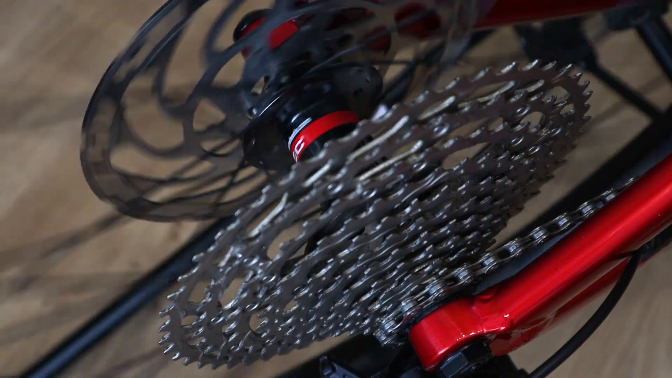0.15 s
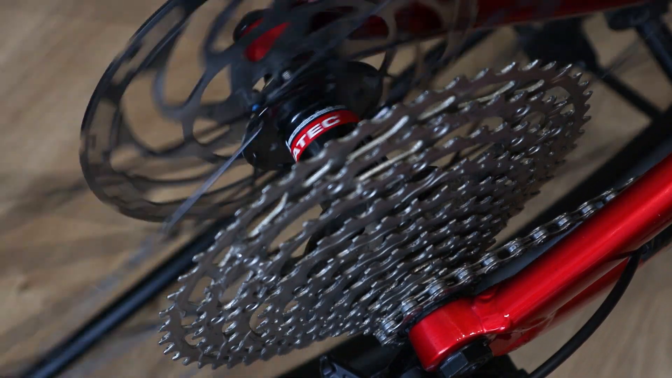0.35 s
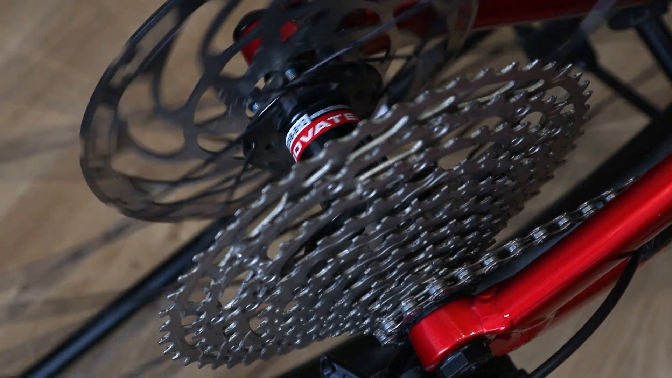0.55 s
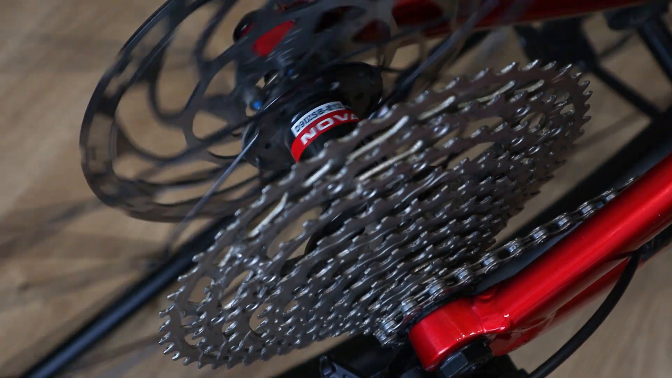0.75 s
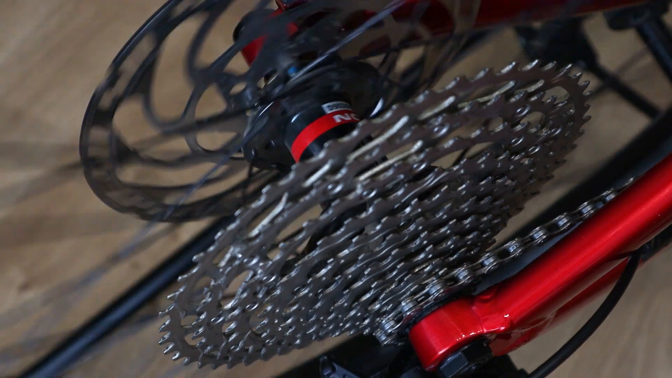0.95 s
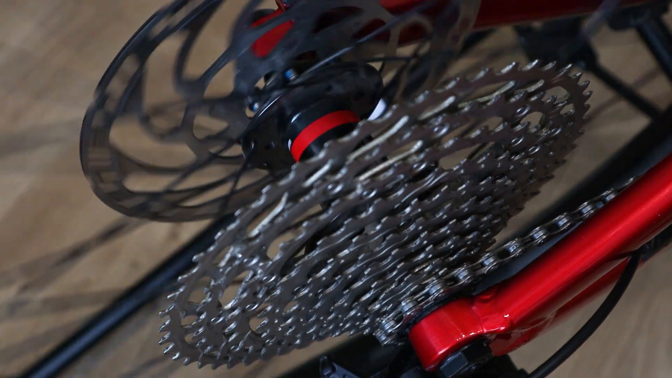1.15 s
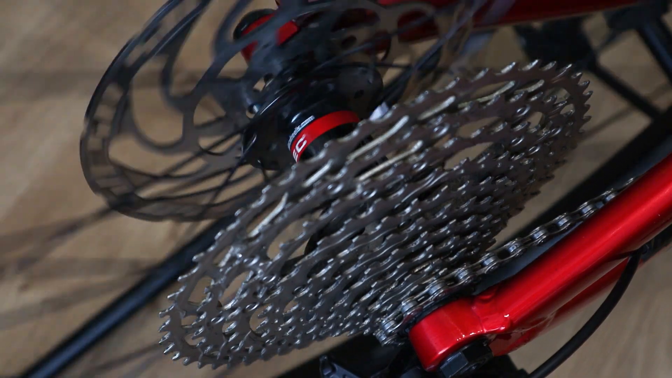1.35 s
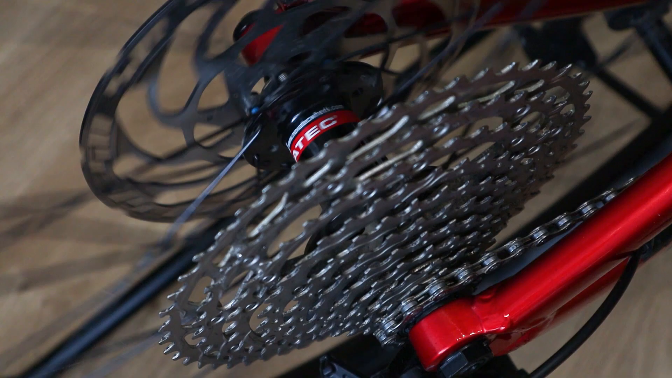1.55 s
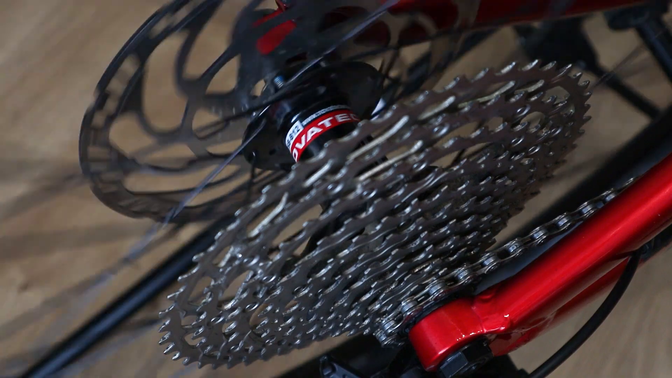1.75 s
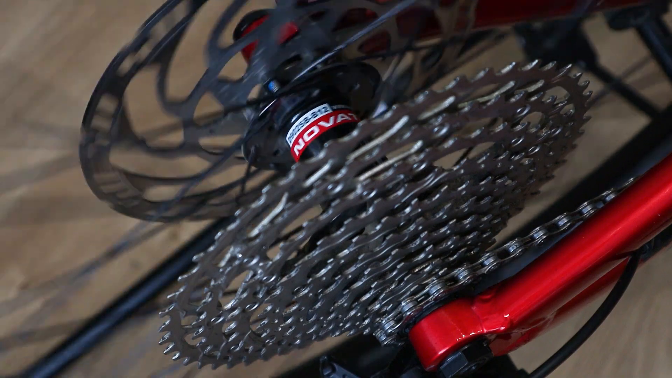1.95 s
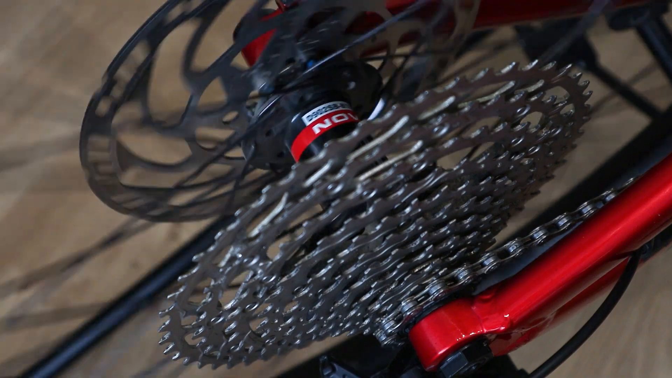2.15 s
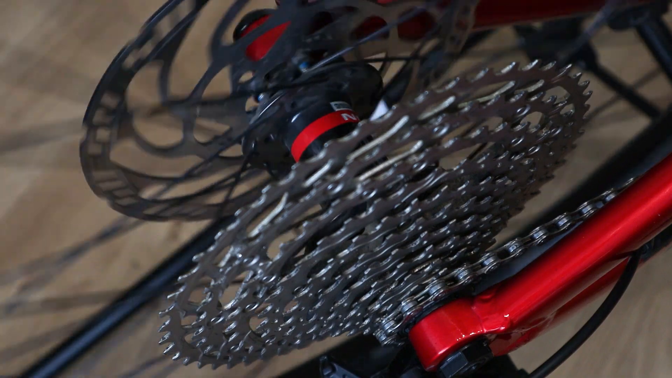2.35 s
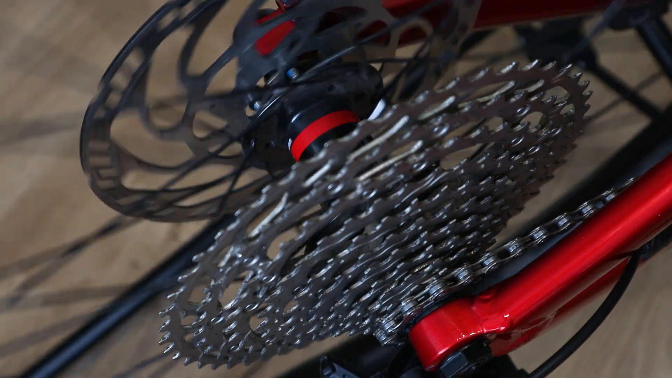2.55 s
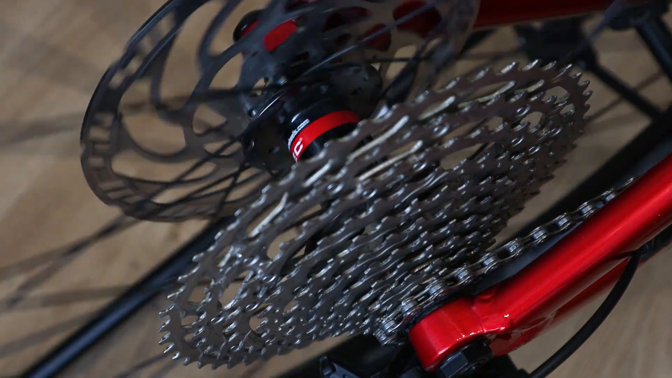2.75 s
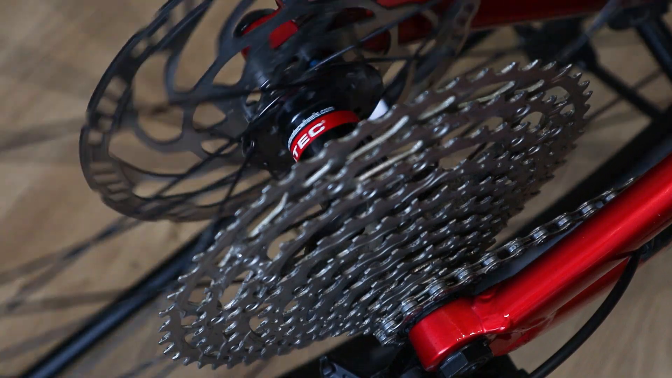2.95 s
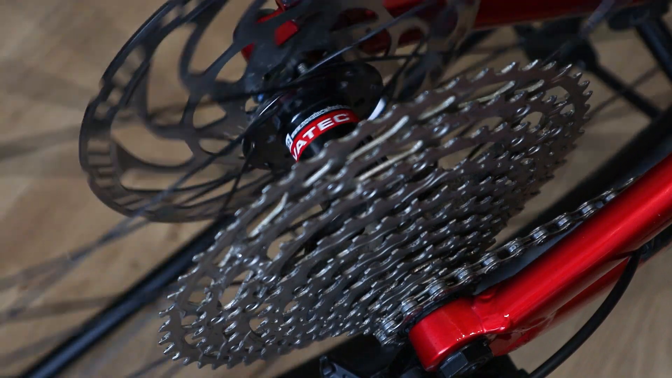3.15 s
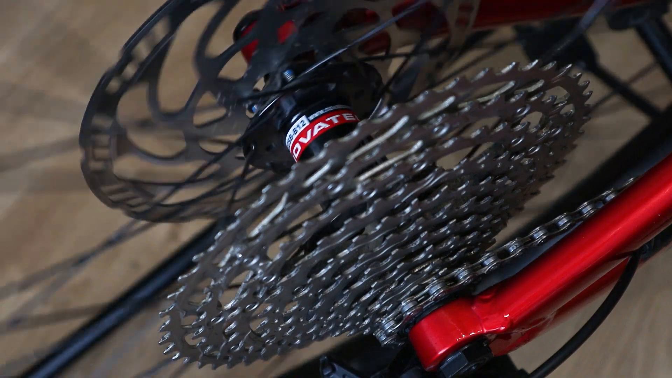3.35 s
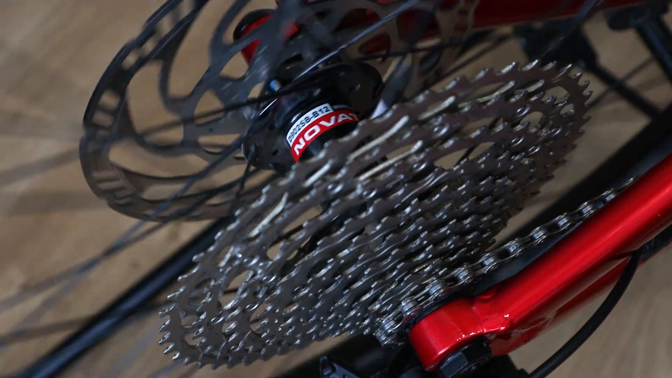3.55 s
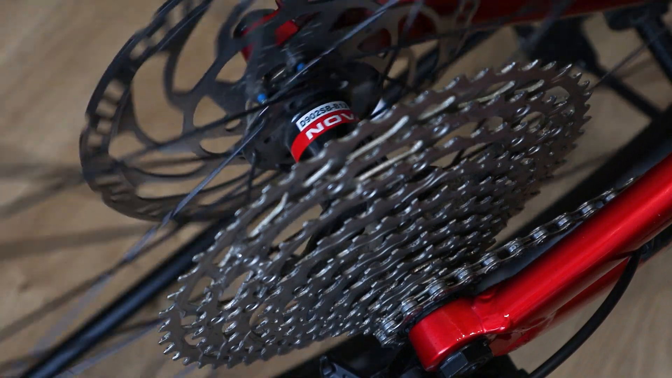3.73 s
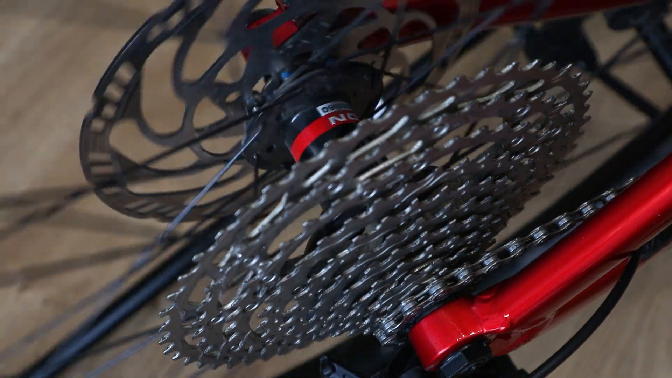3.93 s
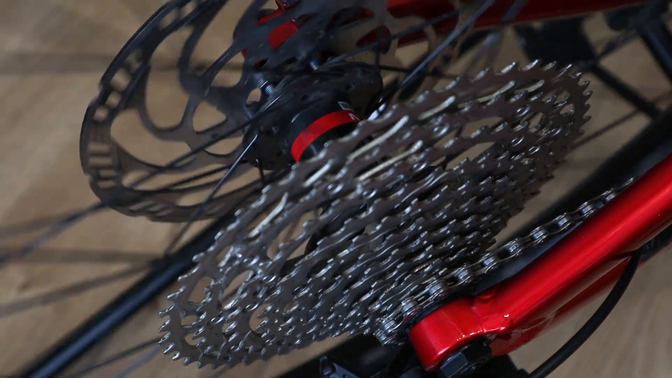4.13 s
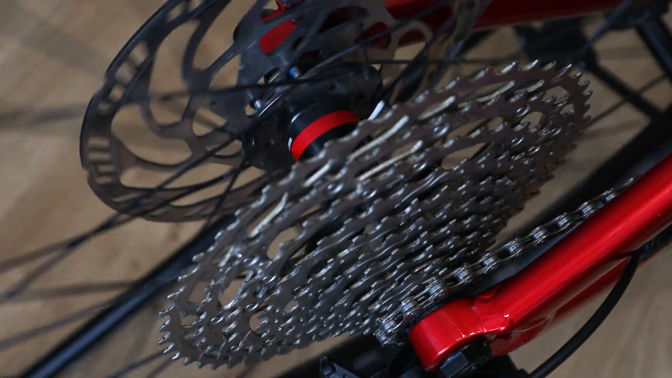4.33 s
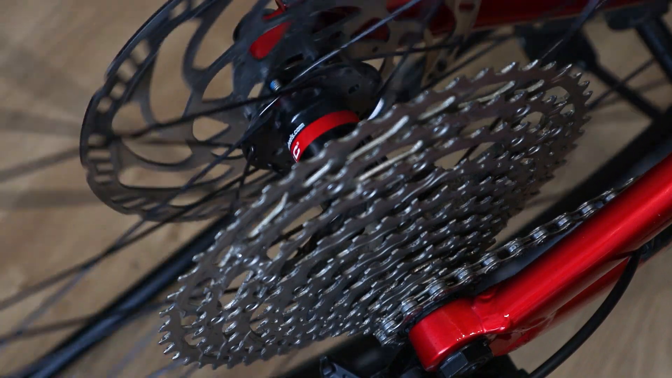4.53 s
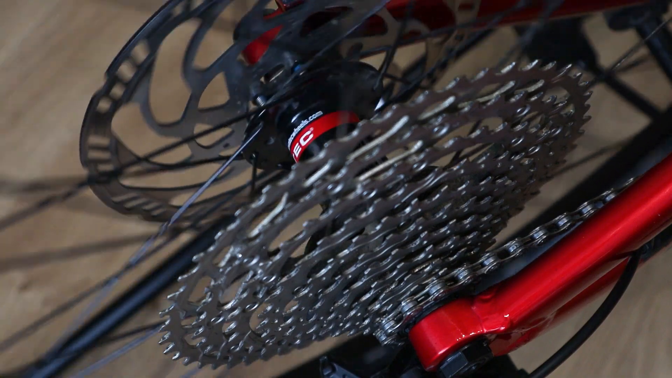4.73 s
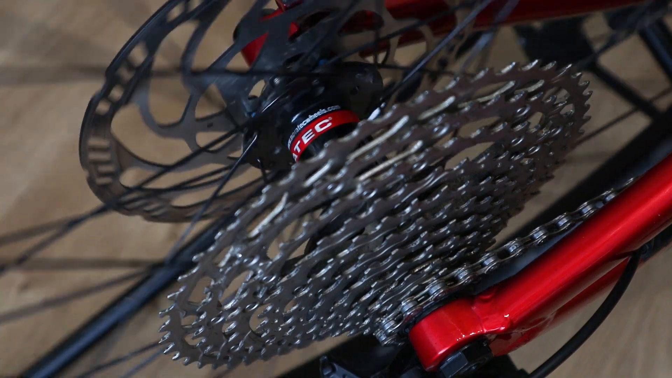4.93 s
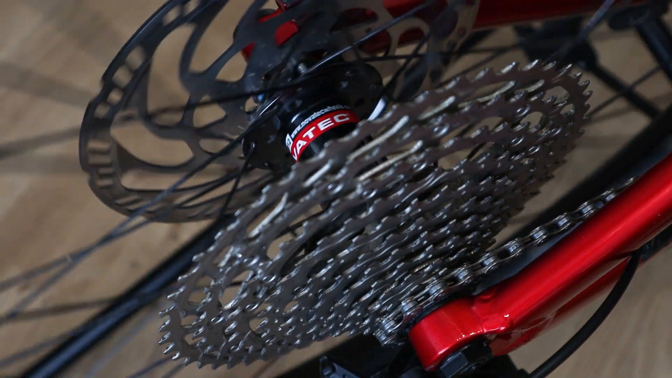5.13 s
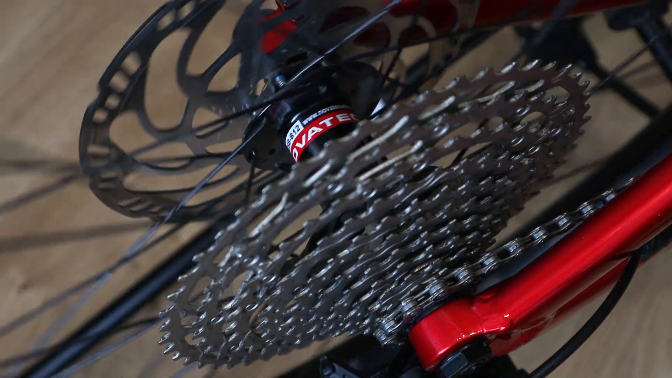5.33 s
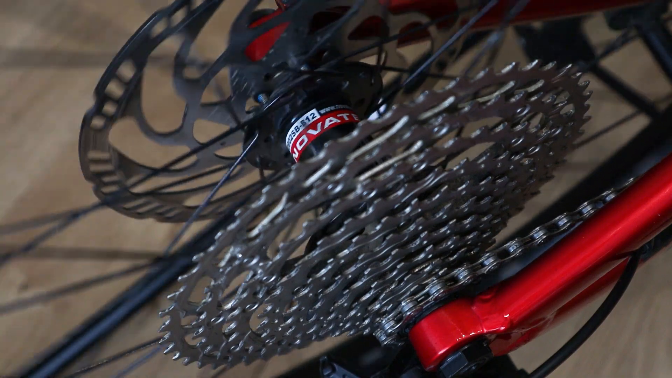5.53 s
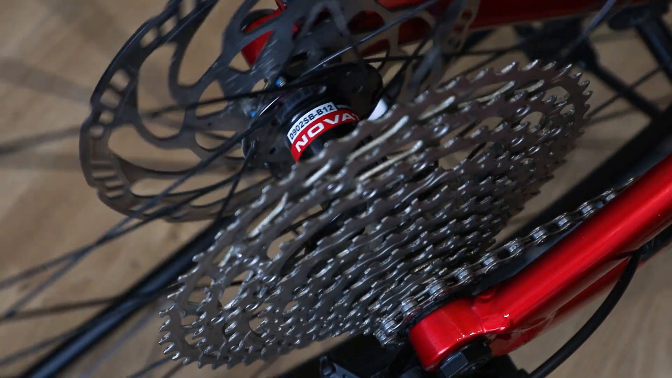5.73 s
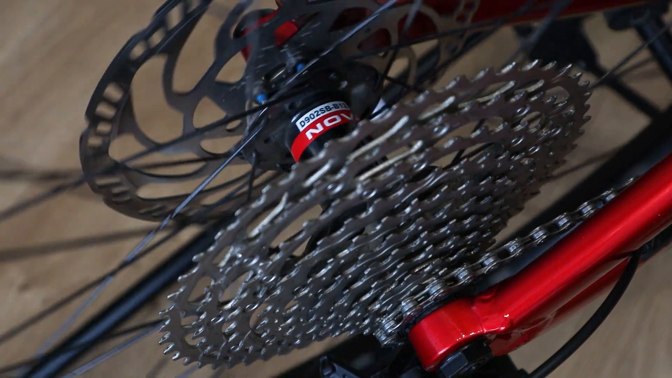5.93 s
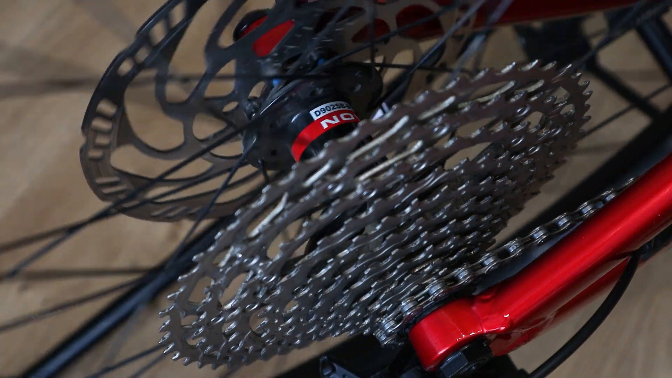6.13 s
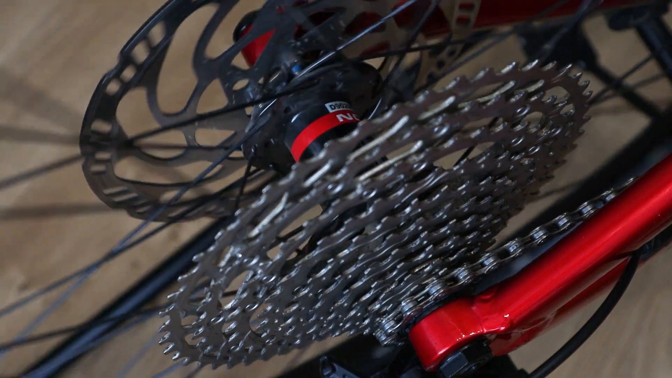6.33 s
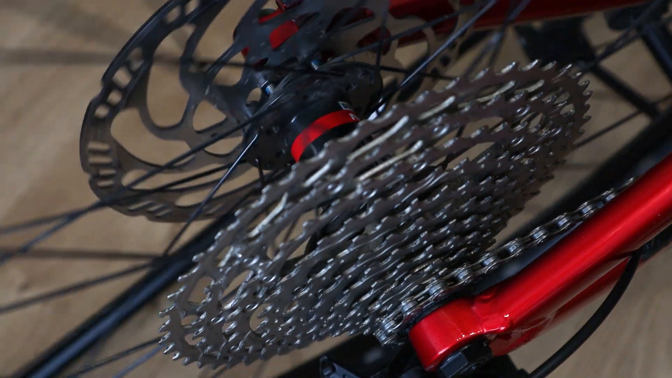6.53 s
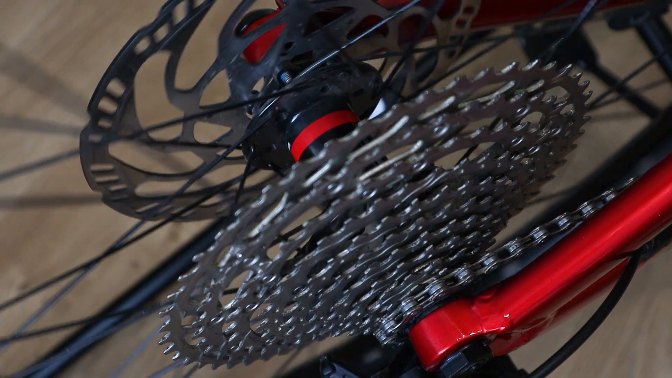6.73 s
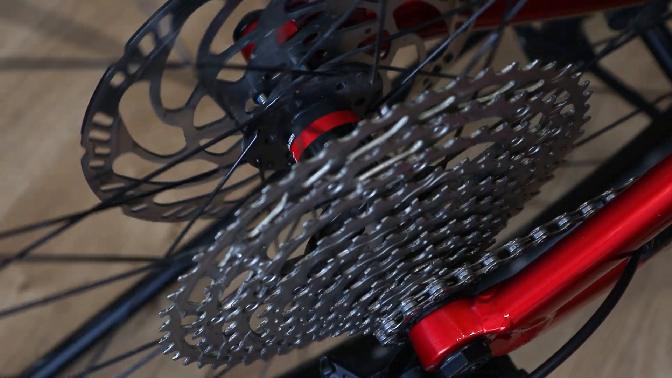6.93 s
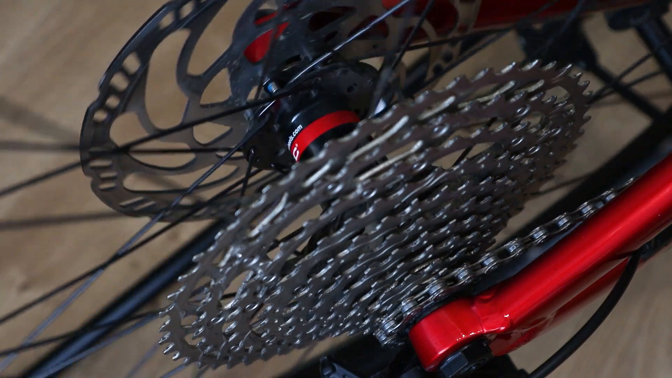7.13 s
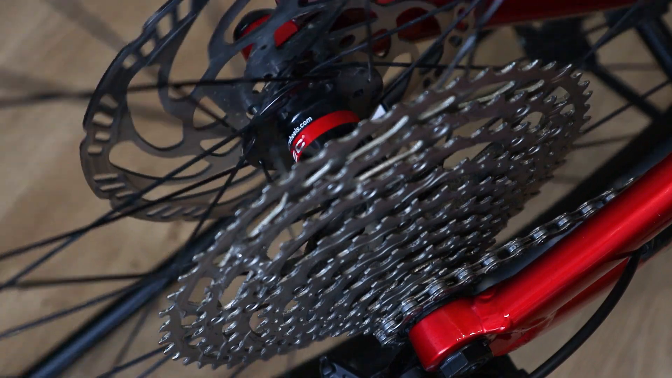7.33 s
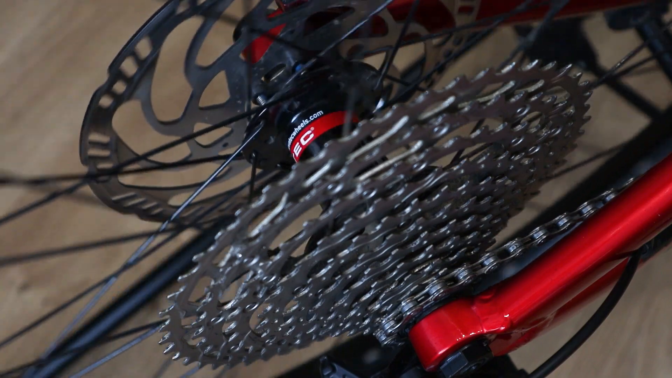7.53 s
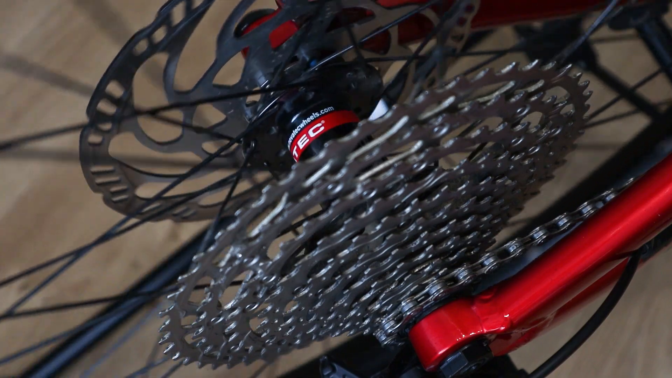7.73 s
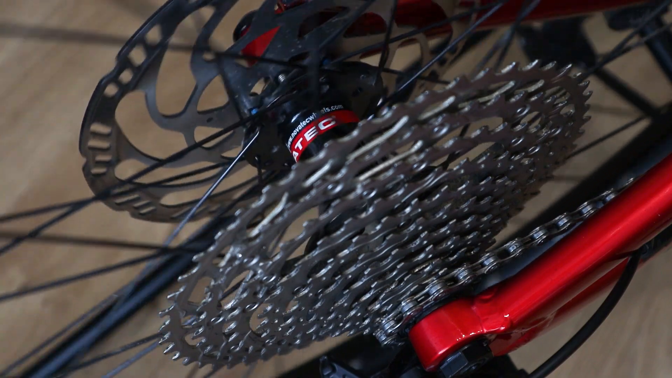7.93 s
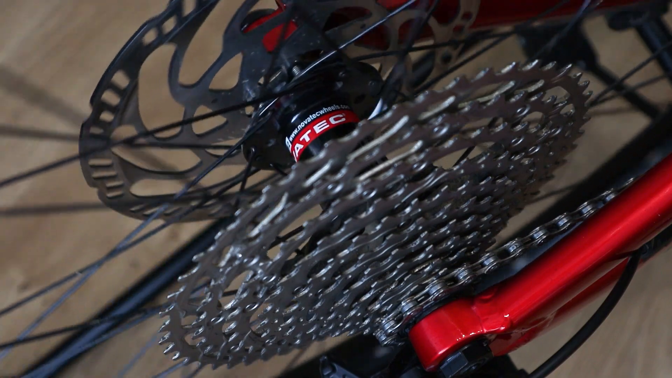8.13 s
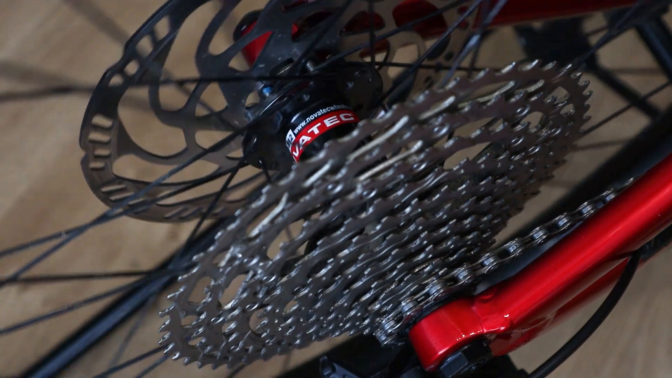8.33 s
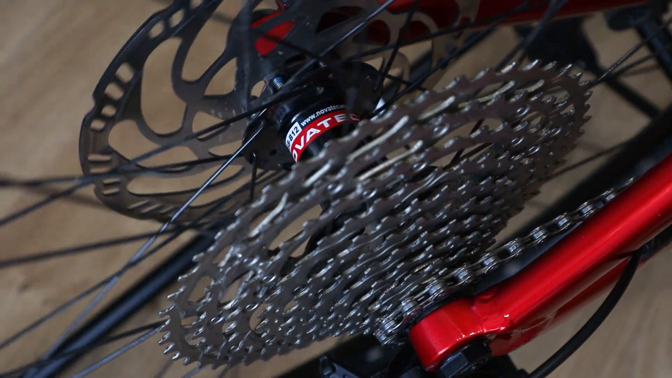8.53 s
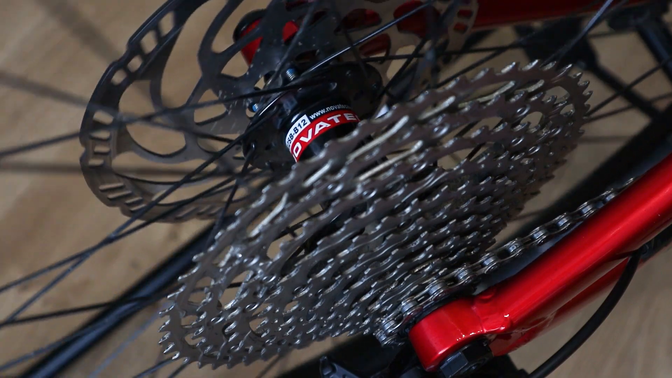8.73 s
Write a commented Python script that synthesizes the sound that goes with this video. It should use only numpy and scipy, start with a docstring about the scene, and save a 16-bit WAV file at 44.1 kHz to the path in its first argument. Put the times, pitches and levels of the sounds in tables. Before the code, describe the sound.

A bicycle rear wheel spins freely, very close to the microphone in a small room. The freehub pawls click rapidly at first, nearly a buzz, then steadily slow down. Each click is a tight cluster of hard metallic ticks with a short bright ring and a brief room echo. By the end the clicks are clearly separate, over a faint low hum.

```python
"""Bicycle wheel coasting down

The rear wheel of a bicycle coasts to a crawl on a stand, close to the microphone in a small room.
At every ratchet tooth four pawls snap down in a quick cluster: shaped noise makes the tick, snap and echo,
and fading sine waves make the ring of the hub, cassette and spokes. The buzz falls apart into single clicks
as the wheel slows. Soft noise and a few wavering low tones make the room hum faintly underneath."""
import sys
import numpy as np
from scipy import signal
from scipy.fft import rfft, irfft
from scipy.io import wavfile

SR = 44100
rng = np.random.default_rng(int(sys.argv[2]) if len(sys.argv) > 2 else 0)


def put_to_file(sound):
    """Save the sound as 16-bit audio at rate SR, in the file named by the first command-line argument."""
    columns = np.atleast_2d(sound).T  # one column per channel
    safe = np.clip(columns, -1, 1)
    whole_steps = np.round(safe * 32767)
    wavfile.write(sys.argv[1], SR, whole_steps.astype(np.int16))


N = 391166  # length of the scene in samples

# overall colour of a blow: (frequency [Hz], level per Hz [dB])
BLOW_COLOUR = [(20, -70), (150, -45), (450, -11), (800, -9.5), (1250, -9.5), (1500, -8.5), (1750, -3),
               (2400, -1), (3300, -1.5), (9000, -1), (14500, 0), (15400, -3)]
# broad resonances of the hub shell, frame and sprockets: (centre [Hz], width [Hz], rise [dB])
BODY_RESONANCES = [(2190, 380, 8), (2750, 500, 2), (4100, 220, 3.5), (4700, 600, 2.5), (5560, 260, 3),
                   (6400, 240, 6), (6780, 220, 7), (7490, 480, 9), (8200, 400, 5.5), (9970, 520, 4),
                   (10600, 550, 4), (11300, 450, 3.5), (12480, 600, 4), (13500, 850, 5.5), (14400, 420, 3),
                   (15000, 200, 3)]


def undb(db):
    """Turn decibels into a gain."""
    return 10 ** (np.asarray(db) / 20)


def unit(x):
    """Scale a sound to an energy of 1."""
    return x / np.sqrt(np.sum(x ** 2))


def fade(t, t60):
    """Free decay of a vibration: 60 dB down after t60 seconds."""
    return np.exp(-np.log(1000) * t / t60)


def high_pass(x, hz):
    """Take away what lies below hz, with a second-order filter."""
    return signal.sosfilt(signal.butter(2, hz, "high", fs=SR, output="sos"), x)


def noise(colour, size, resonances=()):
    """Noise of rms 1 that follows a (Hz, dB) spectrum, raised around each resonance."""
    hz, db = np.transpose(colour)
    f = np.maximum(np.fft.rfftfreq(size, 1 / SR), 1)
    level_db = np.interp(np.log(f), np.log(hz), db)
    for centre, width, rise in resonances:
        level_db = level_db + rise * .5 ** ((2 * (f - centre) / width) ** 2)
    y = irfft(rfft(rng.standard_normal(size)) * undb(level_db), size)
    return y / np.std(y)


def walk(rate):
    """Slow random wavering: straight lines between random points, rate points a second, spread near 1."""
    t = np.arange(N) / SR * rate
    knots = rng.standard_normal(int(t[-1]) + 2)
    return np.interp(t, np.arange(len(knots)), knots)


def room_tone(air_db=-46.0, rise_db=5, drone_hz=43.0, drone_db=-3, waver_db=1, hum_rise_db=4):
    """Soft low noise and a hum of steady pitches that both grow a little, and a wavering drone."""
    # still room: (frequency [Hz], level per Hz [dB])
    air_colour = [(10, -35), (31, -11), (58, -1), (80, -4.5), (160, -4), (200, -1.5), (275, -1), (330, -8),
                  (600, -12), (1500, -17), (15000, -40)]
    # hum, level before its growth and wavering: (frequency [Hz], rms level [dB])
    hum_tones = [(119.8, -51), (241, -61), (393, -63.5)]
    # low drone and rumble, before drone_db is added: (time [s], rms level [dB])
    drone_levels = [(0.3, -57), (0.46, -61), (4.02, -62), (4.98, -46), (5.62, -54), (8.75, -46)]

    t = np.arange(N) / SR
    growth = t / t[-1] - .5  # from -0.5 to 0.5 over the scene
    air = noise(air_colour, N) * undb(air_db + rise_db * growth)
    hum = np.zeros(N)
    for hz, db in hum_tones:
        gain = undb(db + hum_rise_db * growth + waver_db * walk(7))
        hum += gain * np.sin(2 * np.pi * (hz * t + rng.random()))
    drone_gain = undb(drone_db + np.interp(t, *np.transpose(drone_levels)))
    drone = drone_gain * np.sin(2 * np.pi * drone_hz * t + 1.1 * walk(5))
    return air + np.sqrt(2) * (hum + drone)  # a sine of rms 1 peaks at the root of 2


def ripple(turn, table):
    """A pattern that repeats with every turn of the wheel, as a sum of cosines."""
    return sum(depth * np.cos(2 * np.pi * (cycles * turn + offset)) for cycles, depth, offset in table)


def coast():
    """Drag slows the wheel tooth by tooth: time (s), speed (teeth per s) and angle (turns) at each tooth."""
    # ratchet ring slightly off centre and oval: (cycles per turn, share of the tooth gap, offset [cycles])
    gap_ripple = [(1, .004184, .6438), (2, .006973, .7444)]
    teeth_per_turn = 40
    s, rate = .0098, 38.0336  # time of the first tooth (s) and speed then (teeth per s)
    # loss of speed (teeth per s, each s): dry friction, grease (times speed), air (times speed squared)
    friction, grease_drag, air_drag = 1.487, .0640252, .00115479
    # a heavy spot on the rim brakes as it rises and pushes as it falls: (teeth per s, each s), place (turns)
    heavy_pull, heavy_turn = 1.67473, .093056

    teeth = []
    while s < N / SR and rate > 0:
        turn = len(teeth) / teeth_per_turn
        teeth.append((s, rate, turn))
        gap = (1 + ripple(turn, gap_ripple)) / rate  # seconds to the next tooth
        drag = friction + grease_drag * rate + air_drag * rate ** 2
        braking = drag + heavy_pull * np.cos(2 * np.pi * (turn + heavy_turn))
        s, rate = s + gap, rate - braking * gap
    return np.transpose(teeth)


def pawl_drops(spread_s=.0005, spread_pitch=.05, runout=.22, runout_turn=.54, scatter=.08,
               first_db=1.0, uneven_db=1.5, count=4):
    """Pawls fall off each tooth one after another: times and sizes, one row a tooth, one column a pawl."""
    # stronger and weaker teeth come round with the wheel: (cycles per turn, depth [dB], offset [cycles])
    force_ripple = [(1, .25, .36), (12, .65, -.02)]
    # a pawl drops fully on a slow wheel; above full_drop_rate (teeth per s) its blow weakens with speed
    blow_db, full_drop_rate, weaken_db_per_rate, blow_scatter_db = -15.0, 14.8, .13, 0.58

    s, rate, turn = coast()
    shape = (len(s), count)
    # the pawls sit a small angle apart, so they drift apart in time as the wheel slows
    spread = spread_s + spread_pitch / rate
    # the ring runs slightly off centre
    spread = spread * (1 + runout * np.cos(2 * np.pi * (turn + runout_turn)))
    first = np.arange(count) == 0
    # place of each pawl within the cluster, about 0 to 1; only the first is exact
    place = np.abs(np.linspace(0, 1, count) + scatter * rng.standard_normal(shape) * ~first)
    times = s[:, None] + spread[:, None] * place

    force = undb(uneven_db * rng.standard_normal(shape) + first_db * first)
    cluster_db = blow_db - weaken_db_per_rate * np.maximum(rate - full_drop_rate, 0)
    cluster_db = cluster_db + ripple(turn, force_ripple) + blow_scatter_db * rng.standard_normal(len(s))
    # the pawls of one tooth share the energy of its cluster
    sizes = force * (undb(cluster_db) / np.linalg.norm(force, axis=1))[:, None]
    return times, sizes


def room_tail(t, t60=0.4, build_s=0.0033, wall_s=.016, wall_db=-9, wall_t60=0.083, wall_hz=5000):
    """Diffuse echo that builds up quickly, and a bright second swell from the nearest wall."""
    diffuse = noise(BLOW_COLOUR, len(t), BODY_RESONANCES) * fade(t, t60) * (1 - np.exp(-t / build_s))
    bright = high_pass(noise(BLOW_COLOUR, len(t), BODY_RESONANCES), wall_hz)
    wall = bright * (t > wall_s) * fade(np.abs(t - wall_s), wall_t60)
    return unit(unit(diffuse) + undb(wall_db) * unit(wall))


def hub_ring(t, detune=0.00047):
    """Metal parts ring on at their own pitches, as fading sines, each slightly detuned by chance."""
    # long ringing of cassette, spokes and brake disc: (frequency [Hz], energy level [dB], t60 [s])
    modes = [(1341, -30.5, .15), (2130, -23, .09), (2226, -20, .14), (2372, -26, .12), (4081, -23, .18),
             (4115, -25, .15), (4201, -26.5, .25), (5537, -21, .16), (6765, -18, .12), (6802, -16, .16),
             (7508, -16.5, .11), (8162, -19, .17), (9023, -26, .12), (9972, -26, .1), (10555, -25, .12),
             (12699, -21.5, .16), (13390, -24, .12), (14983, -22, .16)]
    ring = np.zeros(len(t))
    for hz, db, t60 in modes:
        own_hz = hz * (1 + detune * rng.standard_normal())
        tone = np.sin(2 * np.pi * (own_hz * t + rng.random())) * fade(t, t60)
        ring += undb(db) * unit(tone)
    return ring


def clack(t, snap_db=-5.0, snap_t60=0.033, thin_hz=1300, tick_db=-10, tick_t60=0.0079, tick_hz=3000,
          ring_db=1.5, room_db=0):
    """One pawl's blow at the microphone: a hard tick, a thin snap of the shell, the ring and the echo."""
    tick = high_pass(noise(BLOW_COLOUR, len(t)) * fade(t, tick_t60), tick_hz)
    snap = high_pass(noise(BLOW_COLOUR, len(t), BODY_RESONANCES) * fade(t, snap_t60), thin_hz)
    direct = undb(tick_db) * unit(tick) + undb(snap_db) * unit(snap)
    return direct + undb(ring_db) * hub_ring(t) + undb(room_db) * room_tail(t)


def freehub(level_db=28.0, common_share=0.38, common_hz=700, lowest_hz=250, count=2):
    """Pawls stand still with the cassette and keep their own sounds; the contact point shifts by tooth."""
    t = np.arange(int(.5 * SR)) / SR  # each blow lasts half a second
    times, sizes = pawl_drops()
    common = clack(t)
    out = np.zeros(N)
    for drops, force in zip(times.T, sizes.T):
        at = np.clip(drops * SR, 0, N - 1).astype(int)
        # a blow is shared between the two corners of the pawl's tip, differently at each tooth
        for share in rng.dirichlet(np.ones(count), len(at)).T:
            # all pawls share a part of their path, and all of it for the long waves
            own = high_pass(clack(t), common_hz)
            response = np.sqrt(common_share) * common + np.sqrt(1 - common_share) * own
            blows = np.bincount(at, force * np.sqrt(share), N)
            out += signal.oaconvolve(blows, response)[:N]
    return undb(level_db) * high_pass(out, lowest_hz)  # small parts radiate no bass


def scene():
    """The freehub over the quiet room, one channel."""
    return (freehub() + room_tone())[None]


def record(dry):
    """The recorder cuts the top with a steep low-pass at 15700 Hz."""
    return signal.sosfilt(signal.ellip(12, .1, 80, 15700, fs=SR, output="sos"), dry)


dry = scene()
out = record(dry)
put_to_file(out)
```